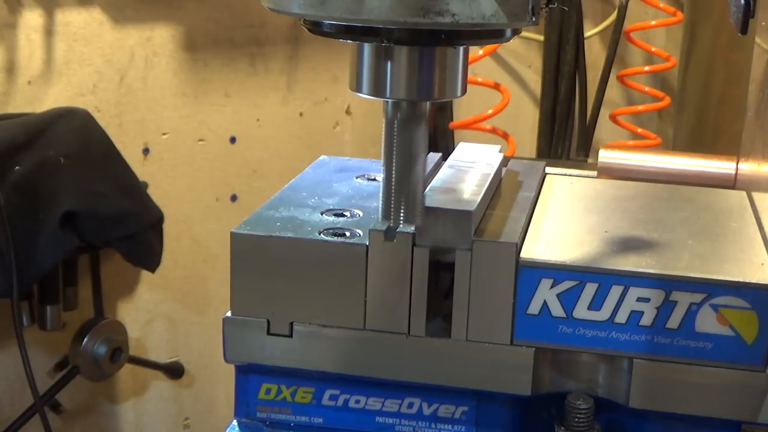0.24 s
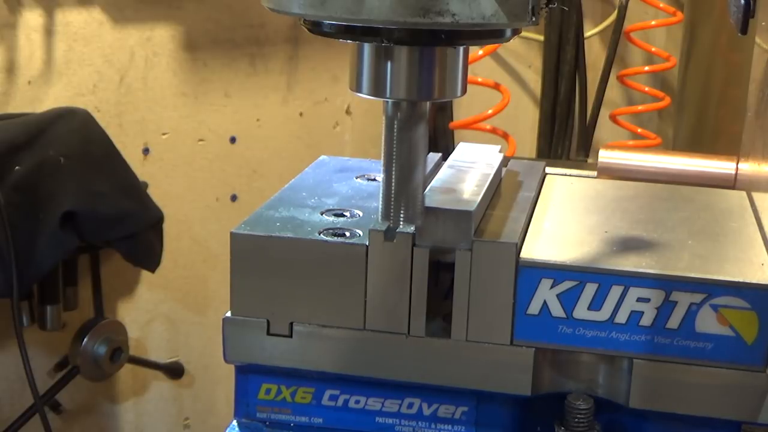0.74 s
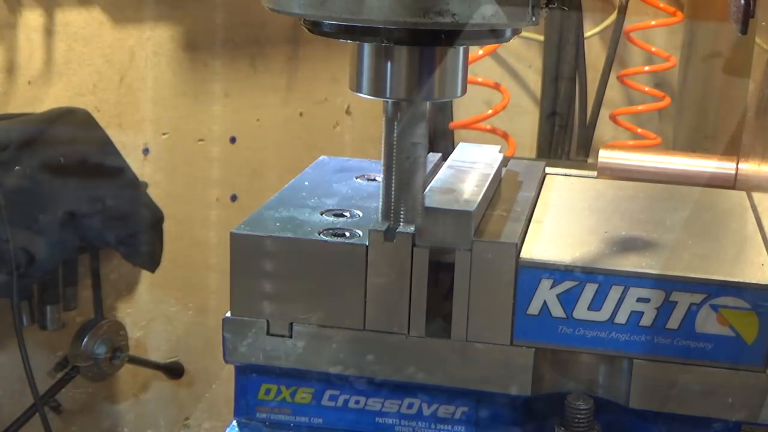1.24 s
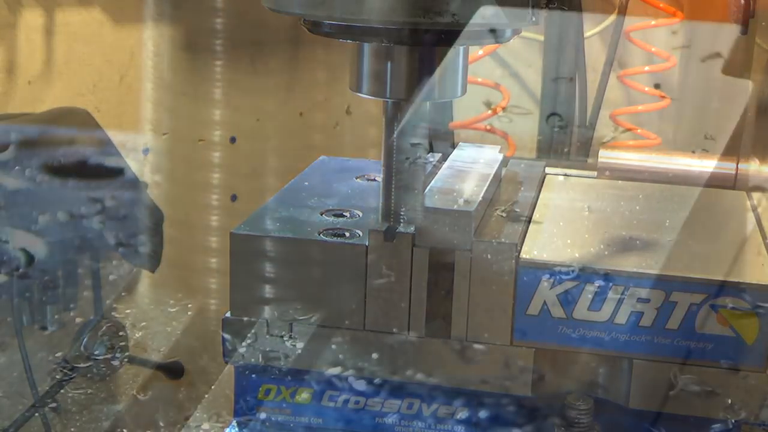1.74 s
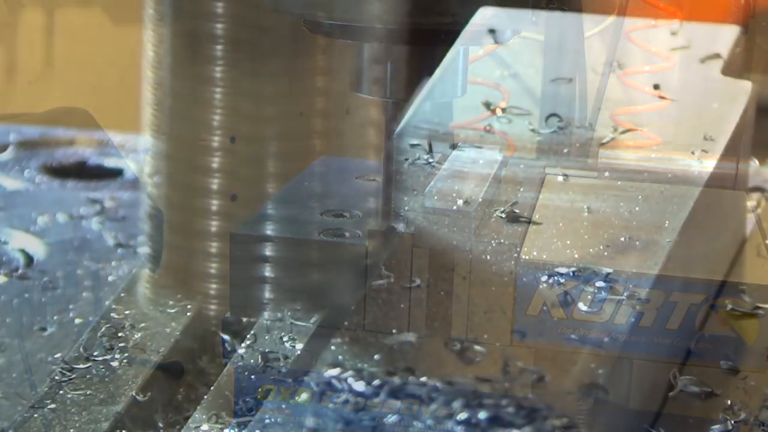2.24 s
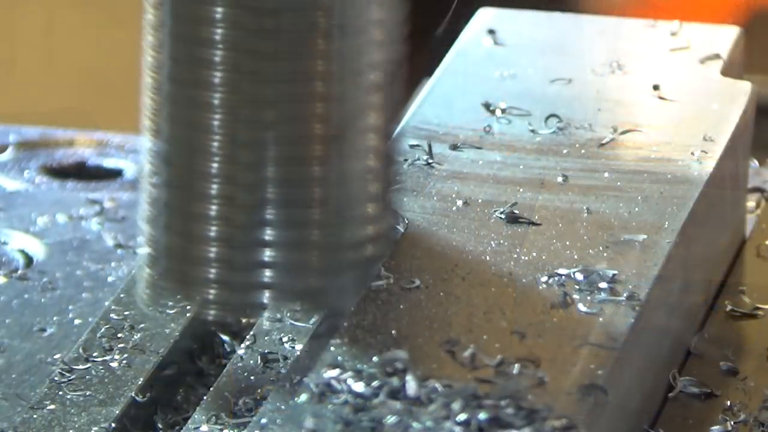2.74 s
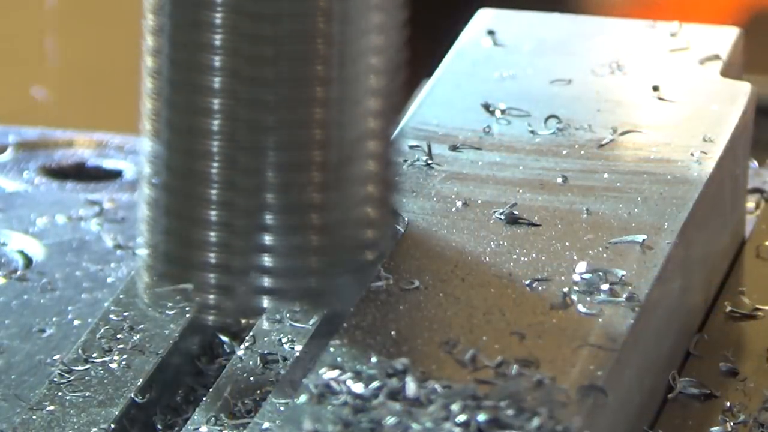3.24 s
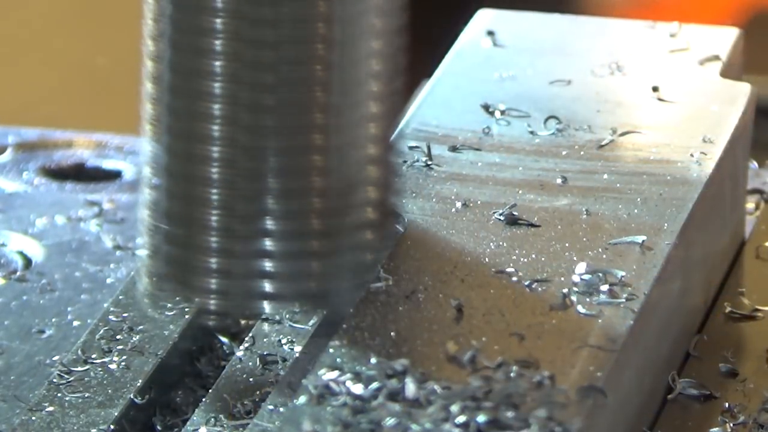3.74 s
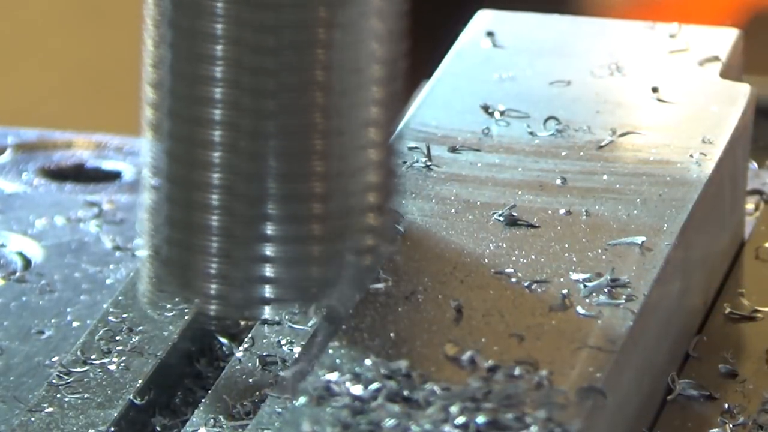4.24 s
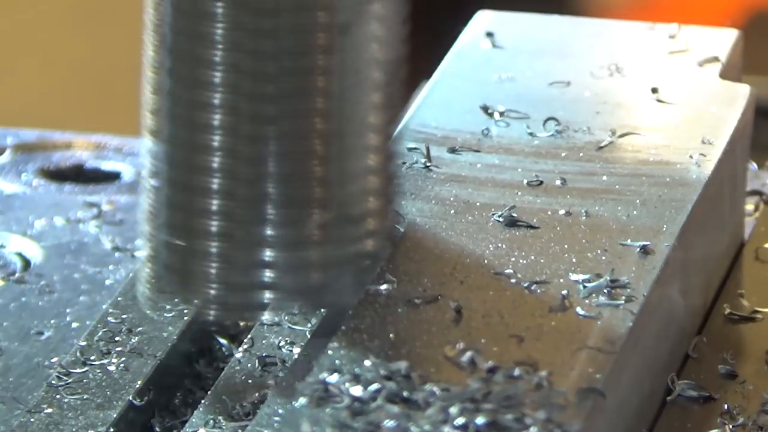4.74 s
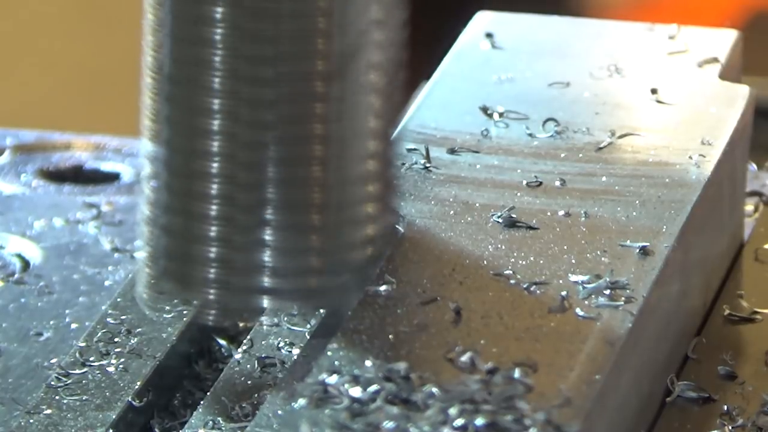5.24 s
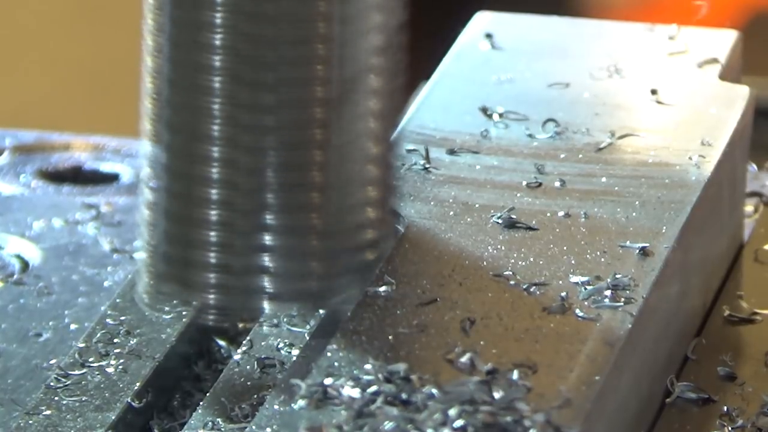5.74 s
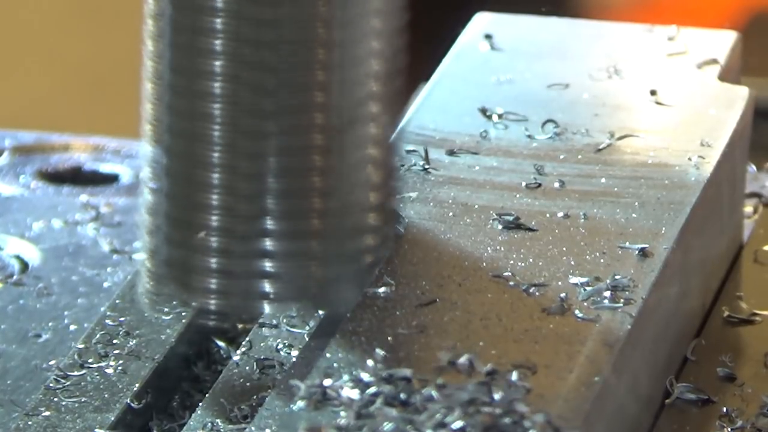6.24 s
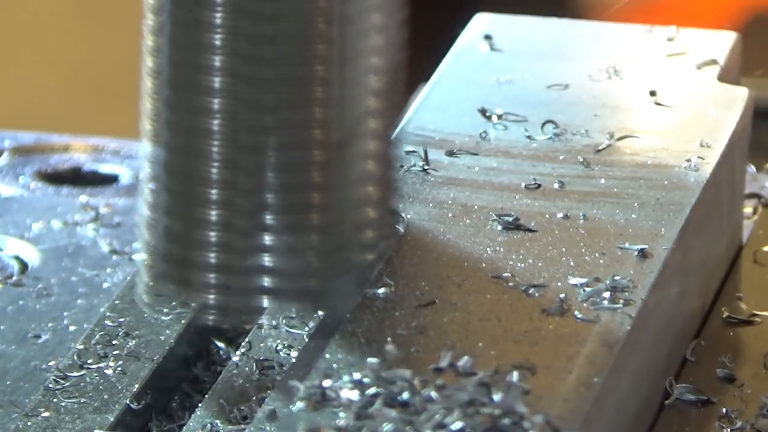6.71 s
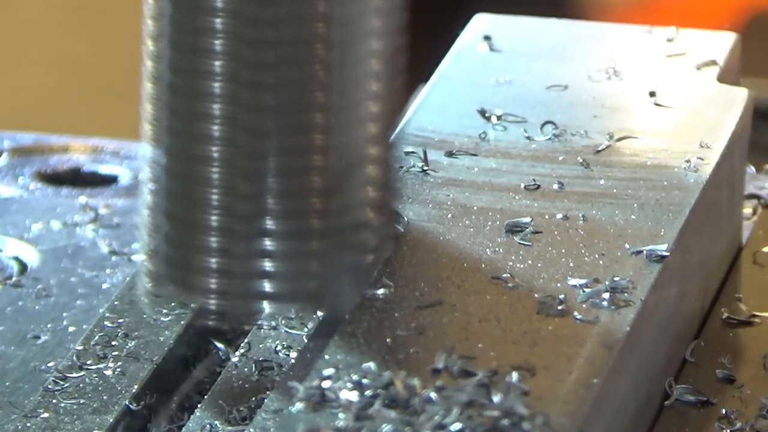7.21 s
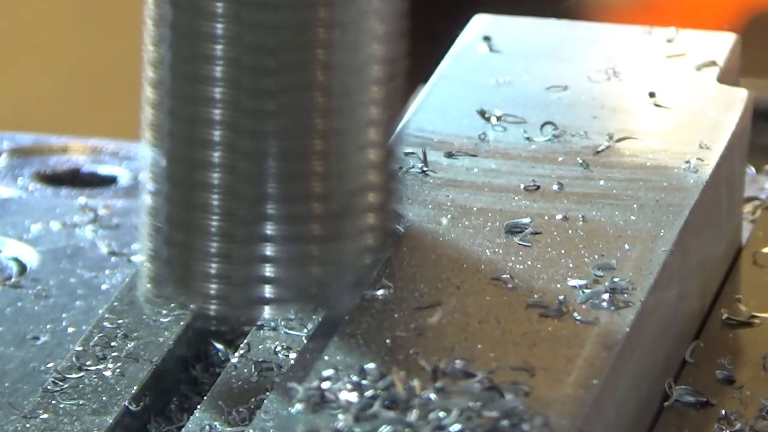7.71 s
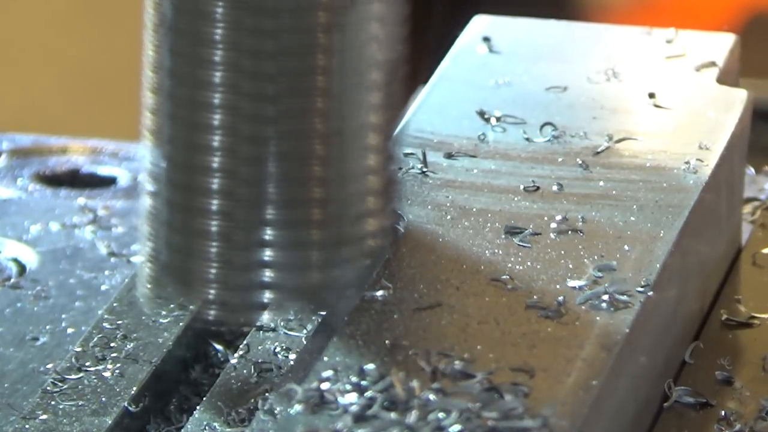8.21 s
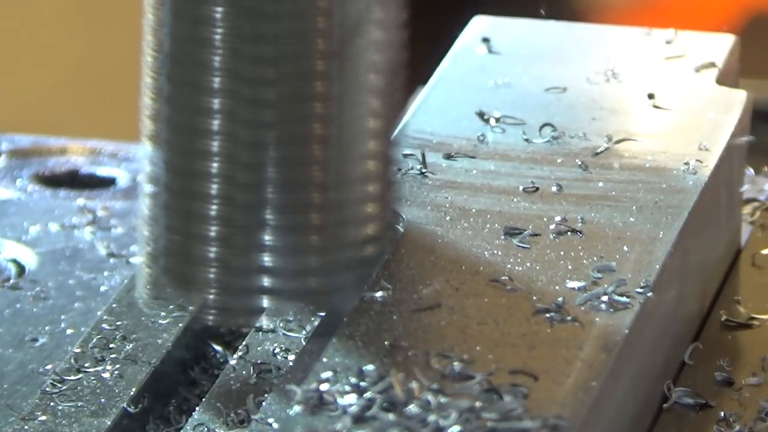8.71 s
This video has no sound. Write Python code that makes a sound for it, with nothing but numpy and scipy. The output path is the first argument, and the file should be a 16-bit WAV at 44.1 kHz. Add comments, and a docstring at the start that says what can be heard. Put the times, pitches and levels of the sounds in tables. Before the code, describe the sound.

Close up in a workshop, a rotating cutter scrapes lightly at steel over the drone and wavering whine of a milling machine. The cut soon becomes louder and rougher, a rapid rattle of bites with a high metallic ring and the hiss of chips tearing off. The hum and whine continue underneath, and the heavier cutting holds steady to the end, heard in stereo and leaning a little left.

```python
"""End milling of steel

A four-flute end mill takes a light cut in a steel bar; the scene then crossfades to a heavier cut. Each bite is
an impulsive force that scrapes off a chip and sets tool and bar ringing. Spindle and gears hum at harmonics of
the turning rate, the motor adds its own tones, and the castings roar by resonance. A stereo microphone stands
close, the machine to its left."""
import sys
import numpy as np
from scipy import signal
from scipy.fft import rfft, irfft, next_fast_len
from scipy.io import wavfile
from scipy.ndimage import map_coordinates

SR = 44100
rng = np.random.default_rng(int(sys.argv[2]) if len(sys.argv) > 2 else 0)


def wrap_up_sound(samples):
    """Save the sound to the file named by the first command line argument, as 16-bit audio."""
    columns = np.atleast_2d(samples).T
    # keep every value between -1 and 1, then stretch to whole-number steps
    tamed = np.clip(columns, -1, 1)
    steps = np.round(tamed * 32767).astype(np.int16)
    wavfile.write(sys.argv[1], SR, steps)


N = 395577
T = np.arange(N) / SR
SIZE = next_fast_len(N + SR // 4)
HZ = np.fft.rfftfreq(SIZE, 1 / SR)
LIGHT, HEAVY = 1, 2  # the load on the tool; selects table columns
LIGHT_TURN_HZ, HEAVY_TURN_HZ = 14.4174, 14.4149  # the spindle slows under load


def cut(turn_hz, load, phases, faint_db, roar_db, cutting_db, ring_db, knock_db, scrape_db, sing_db,
        knock_s, fall_s, contact_s, snap, rubbing, runout_db):
    """Forced vibration: one train of bites drives the cutting sounds, over the machine's hum and roar."""
    bites = flute_bites(turn_hz, load)
    force = cutting_force(bites, fall_s, contact_s, snap, rubbing)
    ring_force = cutting_force(bites, fall_s, contact_s, 1.55 * snap, rubbing)
    edge_force = cutting_force(bites, .7 * fall_s, contact_s, .52 * snap, .6 * rubbing)
    roar = casting_roar(load, force, roar_db)
    cutting = tool_ring(load, bites, ring_force, ring_db, knock_db, knock_s)
    cutting += chip_scrape(force, turn_hz, runout_db) * amp(scrape_db)
    cutting += edge_song(edge_force) * amp(sing_db)
    return cutting * amp(cutting_db) + machine_hum(turn_hz, load, faint_db, phases) + roar


# Entry of each flute into the bar: light_angle_turns, light_level_db, heavy_angle_turns, heavy_level_db
FLUTE_ENTRIES = [(.175, 0, .13, -2.5), (.42, 0, .37, 0), (.67, -2, .61, -3), (.94, -4, .885, -10)]

def flute_bites(turn_hz, load, scatter_db=1.56, jitter_s=.0001):
    """Periodic excitation: four impulses a turn, each slightly irregular in time and strength."""
    angle_turns, level_db = np.array(FLUTE_ENTRIES)[:, 2 * load - 2:2 * load].T
    turn = np.arange(int(N / SR * turn_hz) + 1)[:, None]
    late_s = jitter_s * rng.standard_normal((len(turn), len(angle_turns)))
    onsets = np.abs(np.round(((turn + angle_turns) / turn_hz + late_s) * SR).astype(int))
    strength = amp(level_db + scatter_db * rng.standard_normal(onsets.shape))
    return np.bincount(onsets.ravel(), strength.ravel(), N)[:N]


def cutting_force(bites, fall_s, contact_s, snap, rubbing):
    """Shear and fracture: force rises, sags and ends in a snap as the chip breaks; rubbing persists."""
    t = T[:SR // 20]
    shear = np.exp(-t / fall_s) * (1 - np.exp(-t / .00086)) / (1 + np.exp((t - contact_s) / .00088))
    fracture = snap * np.exp(-.5 * ((t - contact_s) / .0016) ** 2)
    return rubbing + signal.fftconvolve(bites, shear + fracture)[:N]


# Modes of tool and bar: pitch_hz, bandwidth_hz, light_level_db, heavy_level_db
TOOL_MODES = [(3133, 87, -1, -10), (3364, 58, 0.5, -6), (4126, 95, 4.5, 1), (4313, 79, -4, -2.5),
              (4490, 39, 5, -2), (4710, 82, -1.5, -9.5), (5063, 120, -2, -7), (5460, 84, -9.5, -7),
              (5860, 200, -12, -14), (7590, 1350, -15.5, -19.5), (8630, 480, -11, -16),
              (10200, 380, -21.5, -26)]

def tool_ring(load, bites, force, ring_db, knock_db, knock_s):
    """Modal response: tool and bar ring under the noisy force and knock knock_s after each bite."""
    response = modes(TOOL_MODES, HZ, load) * HZ ** 2 / (HZ ** 2 + 2200 ** 2)
    ring = stereo_noise(response, force)
    knock = unit(filtered(bites, response * balance() * delay(knock_s)))
    return ring * amp(ring_db) + knock * amp(knock_db)


# Spectral density of chips tearing off: frequency_hz, level_db
CHIP_SPECTRUM = [(1500, -7), (2100, -3.5), (2870, -13), (3840, -6.5), (6400, -20), (8650, -13),
                 (11300, -16), (11600, -19.5), (13000, -27), (13900, -27), (14800, -31), (15200, -44)]
# Wall reflections: delay_s, level_db
WALL_ECHOES = [(.0021, -17), (.0047, -17), (.0083, -18), (.0131, -20), (.019, -21)]

def chip_scrape(force, turn_hz, runout_db):
    """Amplitude modulation: tearing noise follows the force; runout thickens the chips once a turn."""
    runout = amp(runout_db * np.cos(2 * np.pi * (turn_hz * T - .45)))
    walls = 1 + sum(amp(level_db) * delay(delay_s) for delay_s, level_db in WALL_ECHOES)
    return stereo_noise(amp(along(CHIP_SPECTRUM, HZ)) * walls, force * runout)


def edge_song(force, pitch_hz=13390):
    """Resonance: the flute edge sings in a narrow band of noise."""
    return stereo_noise(resonance(HZ, pitch_hz, bandwidth_hz=220) ** 2, force)


# Gear mesh tones: harmonic, pan_db, light_level_db, light_partner_db, light_swell_s,
# heavy_level_db, heavy_partner_db, heavy_swell_s, in_step_s (when the tones of both cuts are in phase)
MESH_TONES = [(69, 6, -23.2, -25.7, .92, -25.4, -37.4, 1.17, 2.71),
              (72, 6, -29.5, -31.8, 1.02, -36.6, -43.3, .18, 3.59),
              (73, 4.2, -27.2, -28.1, .62, -27.4, -43.7, .52, .04),
              (74, 1.3, -26.1, -33.7, .57, -34.8, -46.6, 1.11, .14)]

def gear_whine(light_gain, heavy_gain, light_beat_hz=.789, heavy_beat_hz=.687):
    """Beats: each mesh tone interferes with a partner just above it, most deeply in the light cut."""
    columns = np.transpose(MESH_TONES)[:, :, None]
    harmonic, pan_db, in_step_s = columns[[0, 1, 8]]

    def pair(turn_hz, beat_hz, level_db, partner_db, swell_s):
        carrier = np.exp(2j * np.pi * harmonic * turn_hz * (T - in_step_s))
        return carrier * (amp(level_db) + amp(partner_db) * np.exp(2j * np.pi * beat_hz * (T - swell_s)))

    waves = light_gain * pair(LIGHT_TURN_HZ, light_beat_hz, *columns[2:5])
    waves += heavy_gain * pair(HEAVY_TURN_HZ, heavy_beat_hz, *columns[5:8])
    waves *= np.sqrt(2) * np.exp(2j * np.pi * rng.random(harmonic.shape))
    return (tone_gains(harmonic[:, 0] * HEAVY_TURN_HZ, pan_db[:, 0], scatter=0) @ waves).real


# Spindle and gear tones: harmonic, light_level_db, heavy_level_db, pan_db
SPINDLE_TONES = [(2, -58, -54, 0), (4, -50, -49, 0), (7, -49, -48, 0), (8, -32, -34, 1), (9, -34, -37, 1),
                 (12, -37, -46, 1), (16, -45, -43, 1), (22, -51, -43, 1), (23, -40, -38, 1),
                 (24, -45, -39, 2), (25, -46, -43, 3), (35, -48, -41, 3), (36, -47, -39, 4),
                 (37, -42, -44, 10), (41, -44, -38, 8), (46, -44, -40, 3), (47, -44, -39, 1),
                 (48, -44, -35, 3), (49, -39, -34, 4), (50, -43, -38, 4), (51, -43, -38, 4),
                 (52, -42, -36, 2), (54, -49, -38, 7), (55, -48, -36, 12), (57, -34, -33, 4),
                 (59, -40, -36, 8), (61, -34, -34, 5), (65, -34, -37, 7), (66, -32, -35, 15),
                 (67, -40, -40, 5), (68, -33, -34, 2), (70, -30, -33, 6), (71, -35, -38, 2),
                 (75, -36, -42, 0), (76, -33, -36, -7), (77, -36, -37, -4), (78, -33, -36, 0),
                 (79, -40, -39, 4), (80, -32, -33, 8), (81, -31, -34, 10), (82, -38, -35, 6),
                 (83, -36, -37, 7), (84, -35, -33, 7), (85, -40, -38, 2), (92, -48, -41, 4),
                 (96, -42, -41, 9), (99, -46, -39, 5), (100, -47, -39, 4), (103, -43, -39, 9),
                 (115, -49, -43, -4), (118, -53, -44, 3), (119, -47, -44, 1), (120, -45, -41, 2),
                 (146, -45, -45, 4), (147, -46, -46, 5), (148, -44, -49, 3)]
# Motor and mains tones: pitch_hz, light_level_db, heavy_level_db, pan_db
MOTOR_TONES = [(92.2, -62, -49, 2), (148.7, -47, -43, -2), (179.0, -42, -42, 3), (240.2, -36, -36, -1),
               (268.5, -47, -42, 1), (298.1, -49, -49, -4), (506.7, -42, -41, 6), (510.7, -51, -48, 4),
               (536.3, -39, -42, 7), (600.2, -48, -45, 6), (742.2, -36, -34, 0), (960.2, -48, -42, -3),
               (2039.6, -54, -46, 4), (2383.5, -52, -46, 4)]

def machine_hum(turn_hz, load, faint_db, phases):
    """Harmonic series of the rotation, plus motor tones; faint harmonics pass through the castings."""
    spindle, motor = np.array(SPINDLE_TONES), np.array(MOTOR_TONES)
    strong = np.r_[spindle[:, 0], np.transpose(MESH_TONES)[0]]
    faint_hz = np.setdiff1d(np.arange(2, 190), strong) * turn_hz
    casting_db = 20 * np.log10(abs(modes(CASTING_MODES, faint_hz, load)))
    casting_db += 3.2 * rng.standard_normal(len(faint_hz))
    faint_pan_db = along(LEVEL_DIFFERENCE, faint_hz) + 3 * rng.standard_normal(len(faint_hz))
    pitch_hz = np.r_[spindle[:, 0] * turn_hz, faint_hz, motor[:, 0]]
    level_db = np.r_[spindle[:, load], faint_db + casting_db, motor[:, load]]
    pan_db = np.r_[spindle[:, 3], faint_pan_db, motor[:, 3]]
    return wavering_tones(pitch_hz, level_db, pan_db, phases[:len(pitch_hz)])


def wavering_tones(pitch_hz, level_db, pan_db, phases, waver_per_khz=.34, spread_hz=.88):
    """Random sidebands: a narrow skirt makes each tone waver, the higher tones more."""
    offsets = np.arange(-30, 31)
    bell = np.exp(-.5 * (offsets * HZ[1] / spread_hz) ** 2)
    noise = rng.standard_normal((len(pitch_hz), len(offsets), 2)) @ [1, 1j] / np.sqrt(2)
    skirt = noise * bell / np.linalg.norm(bell)
    skirt_share = np.clip(waver_per_khz * pitch_hz / 1000, 0, .8)[:, None]
    carrier = (offsets == 0) * np.exp(10j * phases[:, :1])
    lines = (np.sqrt(1 - skirt_share) * carrier + np.sqrt(skirt_share) * skirt) * amp(level_db)[:, None]
    spectrum = np.zeros((2, len(HZ)), complex)
    bins = np.round(pitch_hz / HZ[1]).astype(int)[:, None] + offsets
    np.add.at(spectrum, (slice(None), bins), tone_gains(pitch_hz, pan_db, phases[:, 1])[..., None] * lines)
    return irfft(spectrum, SIZE)[:, :N] * SIZE / np.sqrt(2)


# Modes of castings, vise and table: pitch_hz, bandwidth_hz, light_level_db, heavy_level_db
CASTING_MODES = [(126, 85, -14, -11.5), (233, 59, -17, -11), (328, 38.6, -6.5, -5.5), (542, 44, -16, -10),
                 (700, 61.5, -2, 0), (862, 61, -8, -3), (942, 145, -12, -10), (1023, 90, -3, -3.5),
                 (1196, 57, -1.5, 0.5), (1460, 95, -8, -4.5), (1716, 123, -7, -7.5), (2137, 53, -11, -12.5),
                 (2360, 69, -18.5, -19.5), (2672, 82, -33, -19.5)]

def casting_roar(load, force, level_db):
    """Structural resonance: the castings colour broadband noise, shaken a little by each bite."""
    roar = stereo_noise(abs(modes(CASTING_MODES, HZ, load)), 1 + .25 * force)
    return roar * amp(level_db + 1.7 * wobble(rate_hz=12))


# Roar scattered by the shop: frequency_hz, level_db
SHOP_SPECTRUM = [(150, -45), (250, -26), (450, -24.5), (780, -24), (905, -20), (1050, -14.5), (1500, -24.5),
                 (3000, -47), (5000, -80)]

def shop_roar(level_db=-29):
    """Diffuse field: scattered sound reaches each channel by its own paths, so the two are incoherent."""
    response = amp(along(SHOP_SPECTRUM, HZ)) * balance()
    return unit(filtered(rng.standard_normal((2, N)), response)) * amp(level_db)


# Likeness of the two channels: frequency_hz, coherence
COHERENCE = [(60, .99), (150, 0.98), (380, 0.78), (700, 0.88), (940, 0.54), (1400, 0.63), (2350, 0.79),
             (4500, 0.93), (5600, 0.76), (6300, .999), (15000, .999)]
# Level of left over right: frequency_hz, pan_db
LEVEL_DIFFERENCE = [(60, .7), (130, .6), (290, 1.8), (630, 4.5), (1390, 3), (3050, 1.5), (5400, 1),
                    (6300, 0), (15000, 0)]
# Phase of left ahead of right: frequency_hz, lead_rad
PHASE_LEAD = [(60, .1), (130, .32), (240, .75), (330, .45), (500, .6), (700, .3), (880, .6), (1000, -.1),
              (1200, .3), (1500, -.4), (2400, 0), (6300, 0)]

def stereo_noise(response, envelope):
    """Partial coherence: the channels are the sum and difference of two noises shaped alike."""
    angle = np.arccos(along(COHERENCE, HZ)) / 2
    spectra = rfft(envelope * rng.standard_normal((2, N)), SIZE) * response
    mid, side = spectra * [np.cos(angle), np.sin(angle)]
    lean = amp(along(LEVEL_DIFFERENCE, HZ) / 2) * np.exp(.5j * along(PHASE_LEAD, HZ))
    return unit(irfft(np.array([(mid + side) * lean, (mid - side) / lean]), SIZE)[:, :N])


def tone_gains(pitch_hz, pan_db, scatter):
    """Phase difference: complex channel gains; walls scatter the phase of all but the bass."""
    shift = np.exp(.5j * (along(PHASE_LEAD, pitch_hz) + .52 * np.clip(pitch_hz / 400, 0, 1) * scatter))
    gain = amp(np.outer([.5, -.5], pan_db)) * [shift, 1 / shift]
    return gain / np.abs(gain.mean(axis=0))


def balance():
    """Level difference: left and right gain at each frequency."""
    return amp(np.outer([.5, -.5], along(LEVEL_DIFFERENCE, HZ)))


def modes(table, hz, load):
    """Modal superposition: neighbours of opposite sign leave shallow valleys."""
    return sum((-1) ** k * amp(row[load + 1]) * resonance(hz, *row[:2]) for k, row in enumerate(table))


def resonance(hz, pitch_hz, bandwidth_hz):
    """Frequency response of a damped oscillator."""
    return 1j * hz * bandwidth_hz / (pitch_hz ** 2 - hz ** 2 + 1j * hz * bandwidth_hz)


def delay(delay_s):
    """Linear phase: the frequency response of a delay."""
    return np.exp(-2j * np.pi * HZ * delay_s)


def filtered(x, response):
    """Convolution as a product of spectra."""
    return irfft(rfft(x, SIZE) * response, SIZE)[..., :N]


def wobble(rate_hz):
    """Linear interpolation between random values."""
    return map_coordinates(rng.standard_normal(int(N * rate_hz / SR) + 4), [T * rate_hz], order=1)


def along(points, hz):
    """Interpolation on a logarithmic frequency axis."""
    frequency_hz, values = np.transpose(points)
    return np.interp(np.log(hz + 1), np.log(frequency_hz + 1), values)


def amp(db):
    """Decibels to amplitude."""
    return 10 ** (np.asarray(db) / 20)


def unit(x):
    """Normalisation to unit RMS."""
    return x / np.sqrt(np.mean(x ** 2) + 1e-20)


def scene():
    """Crossfade: the scene changes from the light cut to the heavy one, one fading out and the other in, each
    linearly in power."""
    light_out_s, heavy_in_s = (1.0, 2.9), (1.05, 2.58)
    light_gain = np.sqrt(np.interp(T, light_out_s, [1, 0]))
    heavy_gain = np.sqrt(np.interp(T, heavy_in_s, [0, 1]))
    phases = rng.standard_normal((250, 2))  # per hum tone, for both cuts: starting phase, channel scatter
    light = cut(LIGHT_TURN_HZ, LIGHT, phases, faint_db=-34.5, roar_db=-26, cutting_db=-31,
                ring_db=-2, knock_db=-31, scrape_db=-1.5, sing_db=-11,
                knock_s=.00149, fall_s=.004, contact_s=.0076, snap=.05, rubbing=.18, runout_db=1)
    heavy = cut(HEAVY_TURN_HZ, HEAVY, phases, faint_db=-36, roar_db=-21.5, cutting_db=-26,
                ring_db=-3.5, knock_db=-11, scrape_db=-2, sing_db=-12.5,
                knock_s=.012, fall_s=.035, contact_s=.013, snap=.82, rubbing=.52, runout_db=0)
    return light_gain * light + heavy_gain * heavy + gear_whine(light_gain, heavy_gain) + shop_roar()


def record(dry):
    """Saturation and band limiting: peaks are rounded, the deepest bass and highest treble removed."""
    ceiling, low_hz, top_hz = .95, 25, 15200
    soft = dry / (1 + np.abs(dry / ceiling) ** 4) ** (1 / 4)
    return filtered(soft, (HZ < top_hz) * HZ / np.hypot(HZ, low_hz))


dry = scene()
out = record(dry)
wrap_up_sound(out)
```